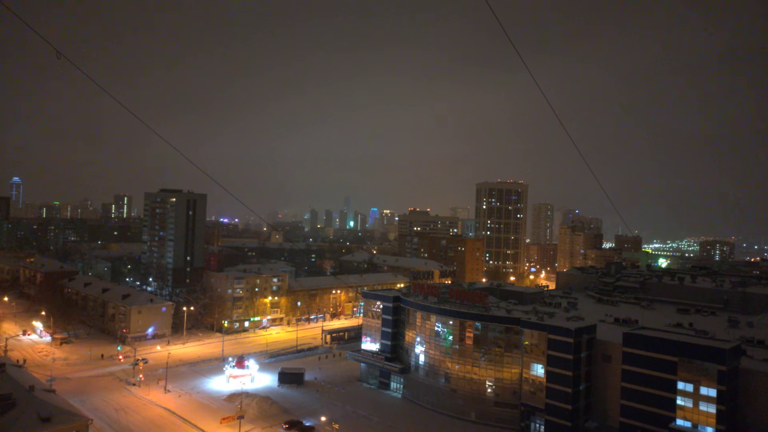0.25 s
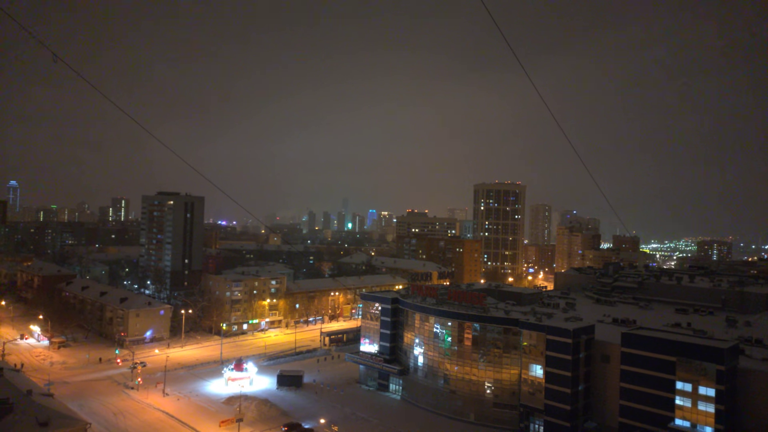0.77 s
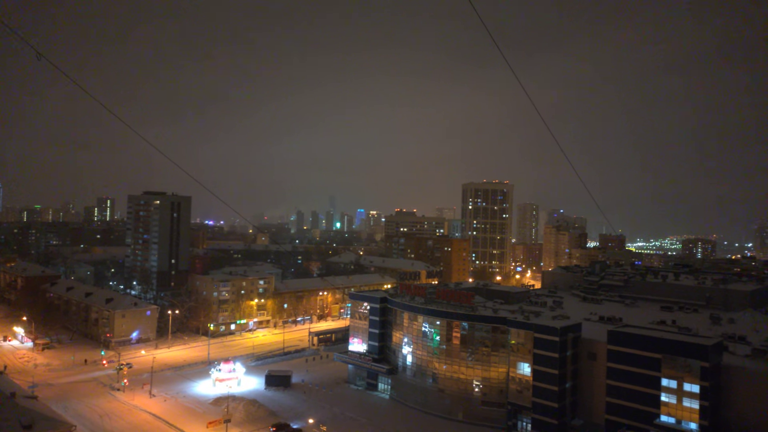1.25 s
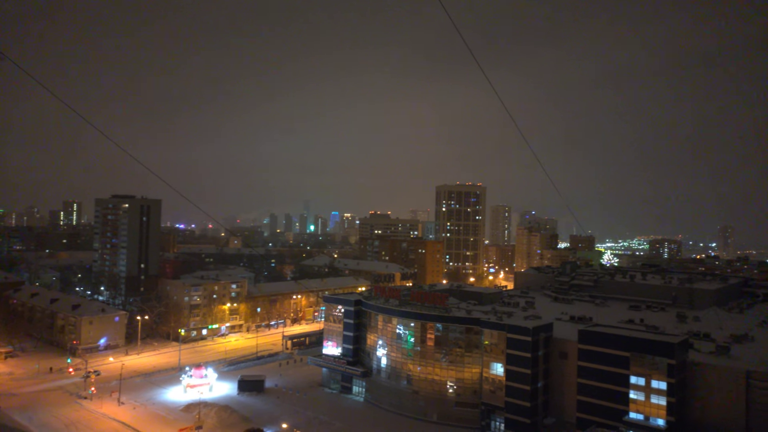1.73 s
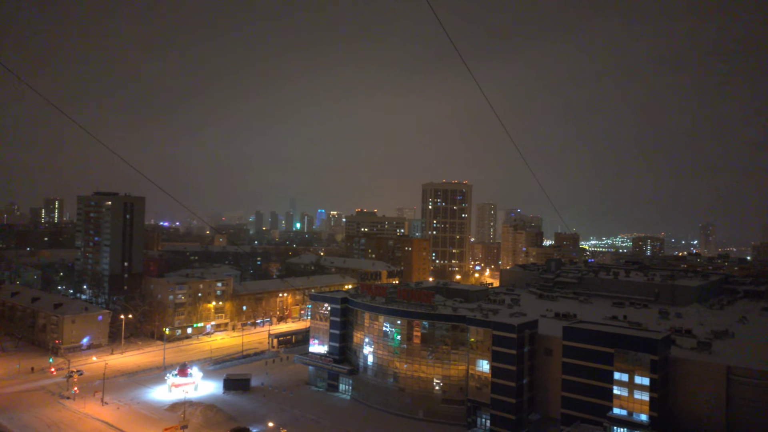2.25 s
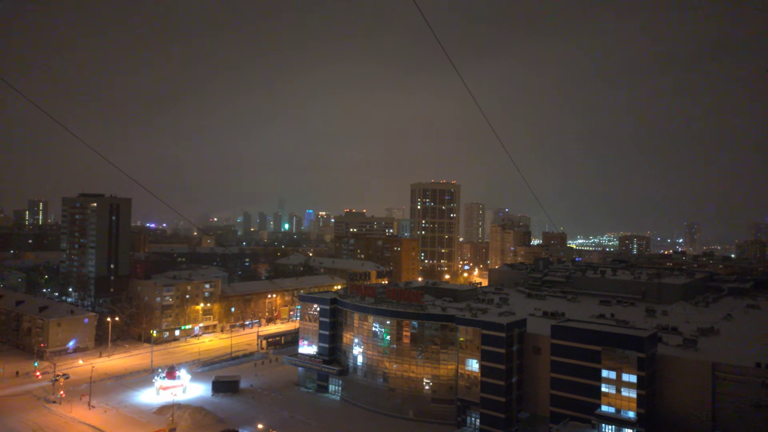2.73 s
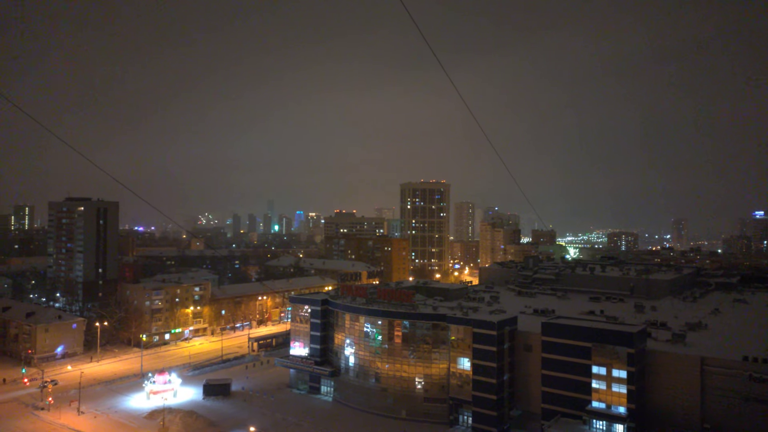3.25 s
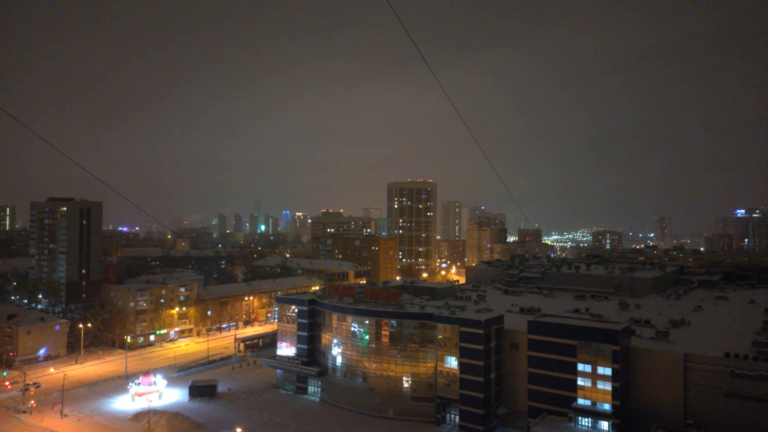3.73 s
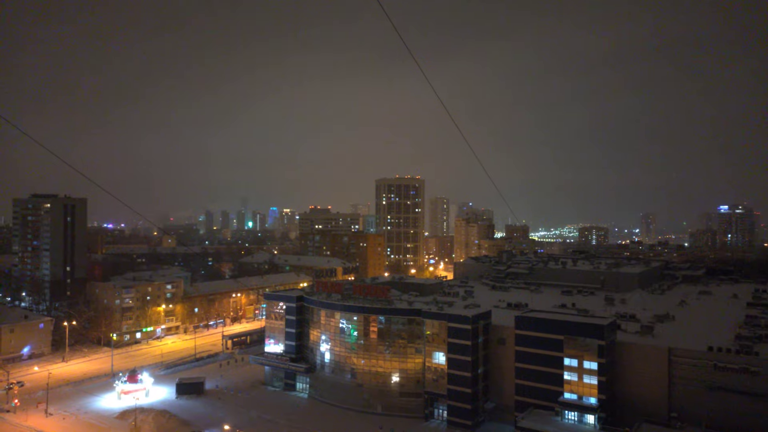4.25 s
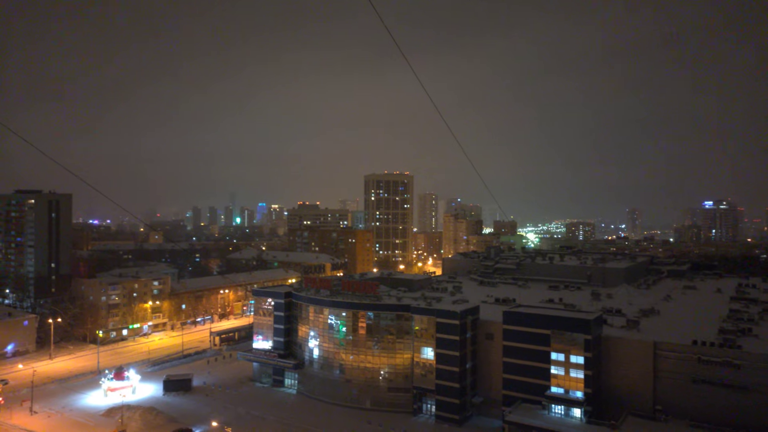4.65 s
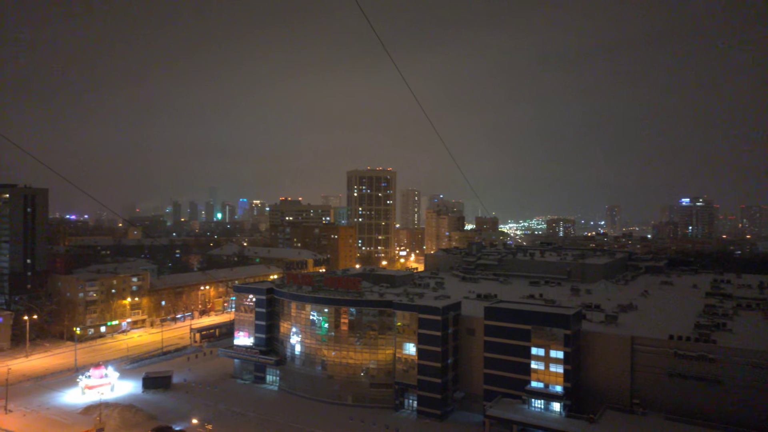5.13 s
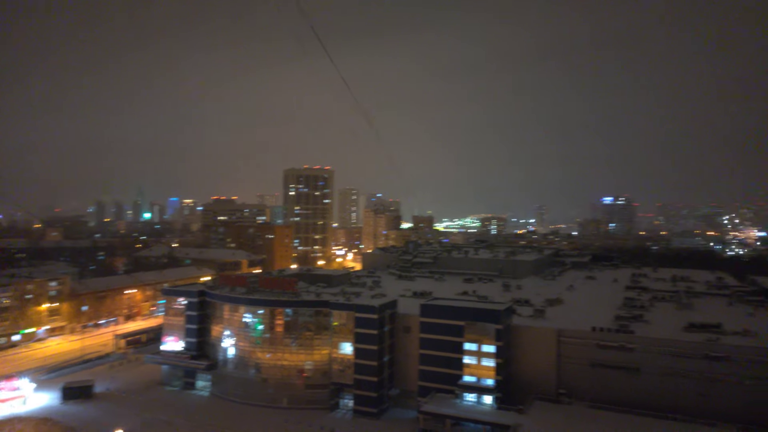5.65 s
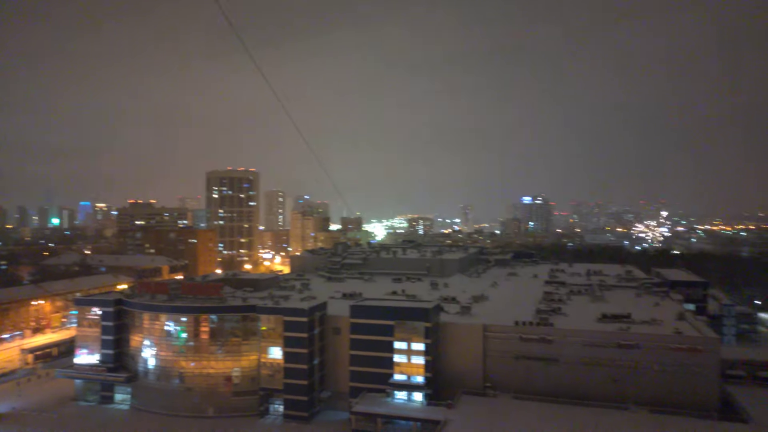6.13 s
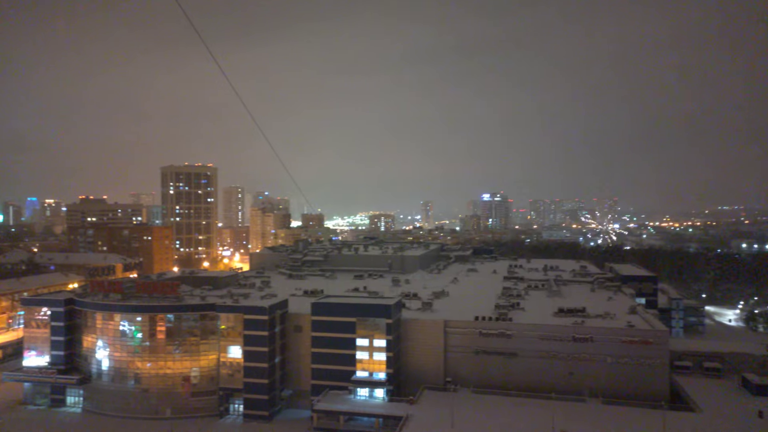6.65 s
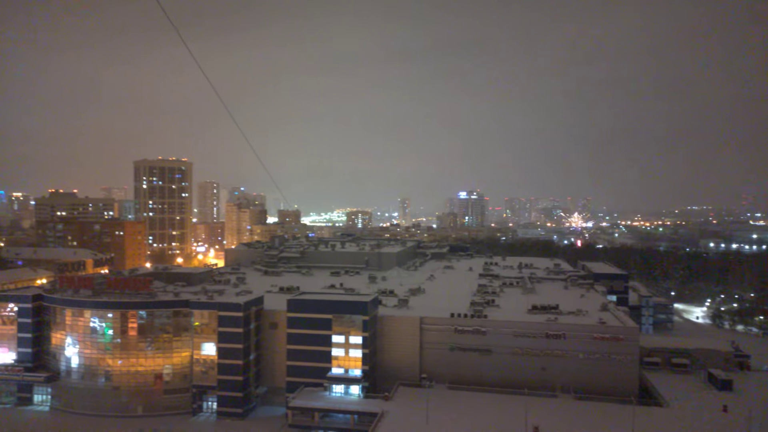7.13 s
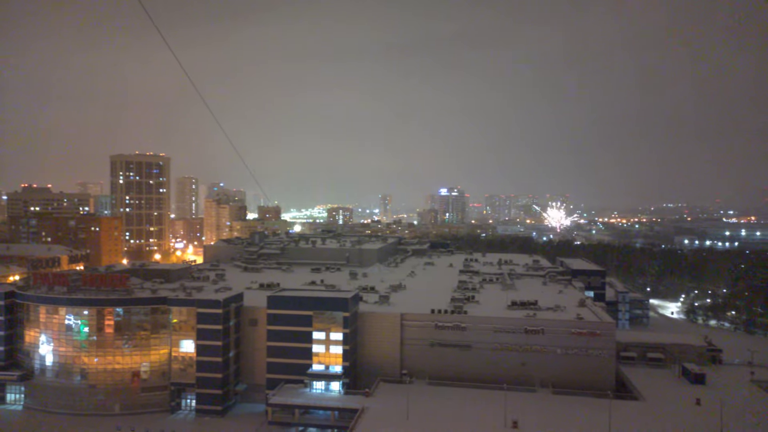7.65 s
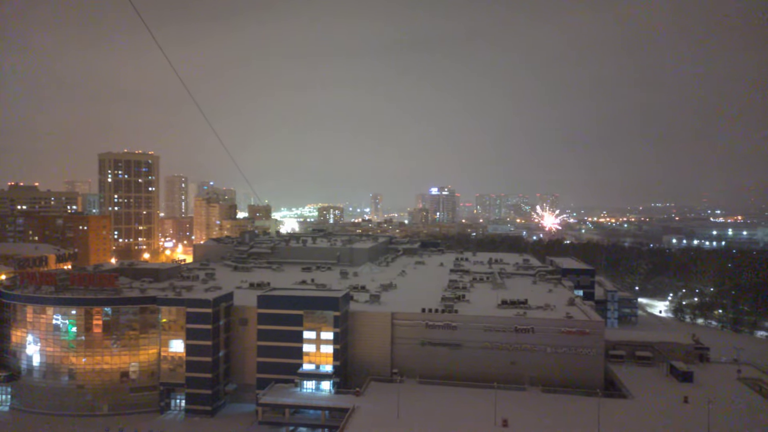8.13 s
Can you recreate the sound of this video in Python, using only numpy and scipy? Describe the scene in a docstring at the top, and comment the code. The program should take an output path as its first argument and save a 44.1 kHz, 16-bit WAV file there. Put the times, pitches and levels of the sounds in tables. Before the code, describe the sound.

A wide stereo phone pickup outdoors catches a dull, wind-like rumble of distant fireworks, mostly low and muffled. Light thuds come first, with a tiny close click near one second, then firmer knocks and double bangs, a faint squeal and brief whistle. Occasional nearer shots return as quick clustered echoes from buildings. After six seconds a nearer display brings strong bangs in quick succession, each lifting the roar.

```python
"""A throbbing rumble of countless far fireworks over a night city, with cloth rustling and ticking close by.
Farther shells bang and roll, each bang a minimum-phase front with decaying echoes; a thin squeal comes
from the road, then short whistles, a snap and a narrow-band tick, all sines of unsteady pitch. A battery
close by fires single shots that the same house fronts return each time; every bang lifts the noisy roar.
Two microphone ports of a phone on a high balcony hear it, differing in colour, level and arrival time."""
import sys
import numpy as np
from scipy import signal
from scipy.fft import rfft, irfft, next_fast_len
from scipy.io import wavfile
from scipy.ndimage import uniform_filter1d, minimum_filter1d

SR = 44100
rng = np.random.default_rng(int(sys.argv[2]) if len(sys.argv) > 2 else 0)


def generate_wav(sig):
    """Save sig (samples, or channels by samples) to the path in sys.argv[1] as 16-bit PCM at SR."""
    pcm = np.round(np.clip(np.atleast_2d(sig).T, -1, 1) * 32767).astype(np.int16)
    wavfile.write(sys.argv[1], SR, pcm)


N = 369558

# Shots of the near battery. Each row: time in seconds, levels of crack, thump and sizzle in dB,
# level added to all house fronts in dB, extra brightness of the first house front in dB.
SHOTS = [(2.6624, -23, -10.5, -49, -4, -3), (3.1172, -26, -9.5, -52.5, -3.5, -2),
         (4.6285, -24.5, -11.5, -47.5, -2, 22.5), (5.8225, -19.5, -8, -46.5, -3.5, -7),
         (8.1293, -24, -11, -51, 0.5, -2)]
# Bangs of farther shells, some with their wall echoes, second arrivals or tails as rows of their own.
# Each row: time in seconds, levels of knock, thump and crack in dB, left minus right in dB,
# echo level in dB, knock pitch in semitones (before a common shift), crack brightness in semitones,
# blur of the front in dB.
SHELLS = [(0.272, -14.5, -18.5, -30.5, 4.5, -21.5, 0.8, -3, -2),
          (0.513, -40, -20, -40, -4.5, -31, -1.2, 1.6, -1), (0.642, -37, -20, -58, 0, -27, -8, -2.4, -2),
          (0.672, -40, -16, -64, 1, -22, 0, -3.8, -2), (0.72, -22, -23.5, -58, 2.5, -22.5, -8, -0.6, 1),
          (1.188, -46, -18, -60, -6, -22.5, -6.0, 1.9, -4), (1.619, -29.5, -16, -62, 8, -29, -2, -9, -1),
          (1.8277, -19, -24, -27, -2.5, -22, -2, -7, -1.5), (1.897, -28, -12, -62, 8, -27, -1, -4.9, -2.5),
          (1.947, -25, -20.5, -62, 4.5, -25, -2, -1, -3), (2.2759, -11, -16, -45, 9, -36, -4.5, -8, -11),
          (2.279, -12, -13, -48, 5, -25.5, -2.5, -8.0, -5.5),
          (2.289, -19, -12.5, -58, 1, -31, -6, -8.0, -7), (2.323, -13, -38, -41, 5, -21, 0.5, -6.5, -6),
          (2.522, -43, -19.5, -57, 0, -23.5, -11, -11, -3), (2.887, -23, -28, -50, 15, -28, -1, -6.7, -3),
          (2.921, -37, -17.5, -58, -4, -27, -2.7, -3.7, -5.5),
          (3.097, -11.5, -26, -31, 2, -29.5, 2.5, -7.3, -2.5),
          (3.107, -19, -22, -28.5, 1.5, -20.5, 1.5, -1.3, -6), (3.203, -42, -16, -34, 3, -21.5, -6.0, 0, 0),
          (3.225, -37, -20, -41, 4, -20, -6, -2.0, -4), (3.25, -34, -21, -33, 3, -21.5, -6, 6, -3),
          (3.293, -42, -33, -40, -2.5, -21, 0.5, -2.0, -2), (3.415, -29.5, -26, -54, 6, -29, -4.5, -4.3, 0),
          (3.642, -34, -16, -40, 5, -23.5, -2, 0.5, -7), (3.74, -41, -15, -45, 3, -25, -11, -0.3, -2),
          (3.806, -32, -22, -40, 0.5, -21.5, -6.0, -5.9, -3), (4.459, -44, -13, -50, 5, -23, -6.0, 0.6, -8),
          (4.508, -32, -19, -57, 10, -23, -2, -3.4, -4), (4.595, -29, -24, -54, 8, -35.5, -1, -6, -7),
          (4.732, -9.5, -21, -26.5, 4.5, -29, 2.5, -12, -4),
          (4.742, -10.5, -25, -31, 7.5, -31, -0.5, -1.2, -4),
          (4.756, -13, -23, -38, 5.5, -30, -4.3, -6.7, -4.5), (4.797, -17, -23, -32, 6.5, -21, 3.5, -2, 1),
          (4.818, -18.5, -26, -40, 6.5, -30, -7.5, -5.5, -2.5),
          (4.839, -30.5, -33, -40, 12, -16, -6, 0, -4), (4.899, -21, -16, -42, 8, -25, -5, -8, -1),
          (5.273, -20, -16.5, -44, 9, -21.5, -5.5, -10, 0),
          (5.333, -28.5, -27.5, -46.5, 1, -13.5, -3.2, -8.5, -6),
          (5.5423, -9.5, -9.5, -42, 4.5, -34, 0, -2, -8), (5.5459, -13.5, -7, -53, 4, -28, -3.5, -6, -6),
          (5.556, -18, -12, -56, 6, -31.5, 1, -6.7, -7),
          (5.588, -14, -16, -35.5, 5.5, -21.5, -0.9, -7, 0.5),
          (5.999, -23, -41, -43.5, 16, -16, -5, -7.7, -4),
          (6.1444, -7, -14, -27, 1.5, -23.5, 0.8, -4.6, -0.5), (6.385, -15, -15, -32, 3, -18, 5, -5, 0),
          (6.505, -23, -18.5, -63, 7.5, -25, -5.5, -5, -3.5),
          (6.577, -9.5, -9.5, -28.5, 4, -20, 3, -5.4, 0.5), (6.822, -28, -24, -46, 0, -22, -6, -4.5, -2),
          (7.077, -19, -13.5, -59, 1.5, -20.5, -5, -6.4, -7),
          (7.26, -16.5, -8.5, -61, 0.5, -23.5, -4, -7.9, 2), (7.389, -17, -15.5, -33, -2.5, -34, -5, -5, 1),
          (7.397, -11, -17.5, -33, -2, -23, 3, -6, 5.5), (7.407, -13, -15, -41, -1, -21.5, 5.5, -5, 1),
          (7.425, -31, -30, -47, 0, -20, -3, -8.0, -2), (7.501, -37, -16.5, -55, -5, -18.5, -7, -5.6, -4),
          (7.523, -10.5, -15, -32.5, -3, -18, -0.4, -5, -0.5),
          (7.543, -24, -19.5, -35.5, 1.5, -23, 8, -5.7, -1),
          (7.5633, -9.5, -15.5, -28, 4.5, -22, -4.5, 0.7, -2),
          (7.675, -23, -22, -62, -6.5, -29, -2, -3, -1), (7.723, -34, -21, -52, 1, -33, -8, -5.9, -4),
          (7.821, -18.5, -21.5, -42, 1, -16, 0.8, -5, -4), (7.829, -6, -8.5, -27.5, 1.5, -24, 3.5, 2, 0),
          (8.076, -18, -15.5, -52, -0.5, -21.5, -4, -6, -8),
          (8.183, -32, -10.5, -29.5, 0, -26, -9, -0.0, -1), (8.191, -34, -21, -21, 5, -33, -4.5, 1, -3.5),
          (8.3, -28, -33, -40, 3, -14.5, -2.5, -4.9, -2)]
ALIKE = (0.25, 0.9, 0.55)  # share of echo power common to both ports: middle, low, high band


def undb(db):
    """Amplitude ratio of a level: 20 dB is a factor of ten."""
    return 10 ** (np.asarray(db) / 20)


def read(table, hz):
    """A spectrum as straight lines between (Hz, value) points on a log-frequency axis."""
    points_hz, values = np.transpose(table)
    return np.interp(np.log(hz + 1), np.log(points_hz), values)


def split(hz, low_hz, high_hz, order=4):
    """Crossover: gains of a middle, a low and a high band whose powers overlap smoothly."""
    low = 1 / (1 + (hz / low_hz) ** 4)
    high = 1 / (1 + (high_hz / (hz + 1)) ** order)
    return np.sqrt(np.array([(1 - low) * (1 - high), low, high]) + 1e-9)


def pulse(gain):
    """Minimum-phase response of a gain curve, peak 1: the treble comes first, the bass follows."""
    cepstrum = irfft(np.log(gain))
    # folding the cepstrum onto positive time makes the response causal
    cepstrum[1:len(gain) - 1] *= 2
    cepstrum[len(gain):] = 0
    response = irfft(np.exp(rfft(cepstrum)))[:len(gain)]
    return response / np.abs(response).max()


def walk(rate):
    """Slow random modulation: levels held 1 / rate seconds and slewed twice; spread near 1."""
    hold = int(SR / rate)
    steps = np.repeat(rng.standard_normal(N // hold + 1), hold)
    return 1.3 * uniform_filter1d(uniform_filter1d(steps, hold), hold)[:N]


def add(train, s, x, pan_db):
    """Interaural cues: sound from the left reaches the left port earlier and louder."""
    pan_db = np.clip(pan_db, -6, 6)
    for port, sign in enumerate((1, -1)):
        i = int(s * SR - 2 * sign * pan_db)
        part = x[port][:N - i]
        train[port, i:i + len(part)] += part * undb(sign * pan_db / 2)


def echoes(t60, rise, alike, lumpy_db, size=1 << 14):
    """Diffuse reverberation: lumpy noise swells and decays exponentially; the ports share part of it."""
    t60 = np.clip(t60, .006, 1.5)
    both, *own = rng.standard_normal((3, size))[:, :int(t60 * SR)]
    t = np.arange(len(both)) / SR
    lumps = np.repeat(undb(lumpy_db * rng.standard_normal(size // 128 + 1)), 128)[:len(t)]
    share = np.clip(alike, 0, 1)
    shape = (1 - np.exp(-(t / rise) ** 2)) * undb(-60 * t / t60)
    return shape * lumps * (np.sqrt(share) * both + np.sqrt(1 - share) * np.array(own))


def rolling(base_db, layer):
    """Power summation: a layer's gain joins its own power to the power each bang leaves rolling."""
    # What a bang leaves over the town; rows are rumble, wash, deep roll, bright wash.
    # Each row: level relative to the bang in dB, rise in seconds, 60 dB decay time in seconds.
    after_shot = [(-10, 0.31, 0.5), (-20.5, 0.22, 0.99), (-24, .05, 1.1), (-29.5, 0.081, 0.83)]
    after_shell = [(-11.5, 0.1, 0.17), (-35, 0.045, 0.36), (-34, 0.025, 0.4), (-21.5, 0.034, 0.41)]
    # thumps feed rumble and deep roll, cracks and knocks the wash;
    # the crack of either kind feeds the bright wash
    columns = ((2, 2), (1, 1), (2, 2), (1, 3))[layer]
    t = np.arange(N)[::128] / SR
    power = undb(base_db) ** 2
    for bangs, after, column in zip((SHOTS, SHELLS), (after_shot, after_shell), columns):
        bangs = np.array(bangs)
        db, rise, t60 = after[layer]
        since = np.maximum(t - bangs[:, :1], 0)
        swell = 1 - np.exp(-(since / rise) ** 2)
        each = swell * undb(bangs[:, column, None] + db - 60 * since / t60)
        power = power + np.interp(np.arange(N) / SR, t, np.sum(each ** 2, axis=0))
    return np.sqrt(power)


def city():
    """Superposed far shells become modulated noise, partly coherent between the ports; air hisses on top."""
    # Background. Each row: time in seconds, levels of rumble, wash, hiss, bright wash and deep roll in dB.
    background = [(0.0, -28, -36, -58, -67, -47.5), (0.7, -24.5, -45.5, -56, -55, -54),
                  (0.87, -25.5, -38, -56.5, -47.5, -51), (1.02, -26.5, -44.5, -55, -54.5, -52),
                  (1.4, -28, -45, -60.5, -61, -47), (1.91, -25.5, -49, -59.5, -60, -48),
                  (2.63, -26.5, -36.5, -59, -52, -50), (3.17, -25.5, -40.5, -56.5, -51.5, -41.5),
                  (3.24, -28, -38, -47, -40, -38), (3.38, -24, -36.5, -59.5, -50, -50.5),
                  (4.15, -24.5, -38, -62, -54.5, -44), (4.46, -27, -40.5, -60, -57, -48),
                  (4.67, -21, -36.5, -60, -55, -53), (4.81, -22, -29.5, -53, -44.5, -54),
                  (5.02, -24.5, -36, -61, -54, -45.5), (5.86, -26, -40, -57.5, -58, -56),
                  (6.02, -23, -38.5, -58.5, -59, -63), (6.18, -24, -39, -61, -49, -45),
                  (6.42, -27.5, -41, -63.5, -58, -42), (6.6, -22, -36, -60, -49, -49),
                  (7.0, -25.5, -37.5, -62, -60, -49), (7.35, -27, -40, -63, -73, -49.5),
                  (8.12, -20.5, -44, -63, -51, -52.5), (8.27, -23.5, -49, -51, -51, -58),
                  (8.31, -28, -50.5, -61, -47, -56), (8.38, -23, -32, -58, -45, -53)]
    # Spectrum of the roar. Each row: frequency in Hz, spectral level in dB per Hz.
    roar = [(20, -21), (80, -25.5), (175, -2), (260, 0), (590, -8.5), (800, -16), (1300, -21), (2200, -37),
            (3000, -39), (3500, -46.5), (4500, -49.5), (6500, -54), (8400, -52), (10000, -64),
            (15700, -80.5)]
    # Directness. Each row: frequency in Hz, share of the power that comes from one side.
    direct = [(60, 0.92), (170, 0.94), (300, 0.8), (800, 0.19), (2000, 0.37), (6000, 0.078)]
    bright_hz, bright_octaves = 2255, 0.49
    deep_hz, deep_width_hz = 80.4, 48
    drift_db, drift_per_s = 1, 5  # wash and bright wash each wander on their own

    s, *curves = np.transpose(background)
    t, size = np.arange(N) / SR, next_fast_len(N)
    rumble_db, wash_db, hiss_db, bright_db, deep_db = (np.interp(t, s, db) for db in curves)
    wash = rolling(wash_db + drift_db * walk(drift_per_s), layer=1)
    rumble = rolling(rumble_db, layer=0)
    bright = rolling(bright_db + drift_db * walk(drift_per_s), layer=3)
    levels = wash, rumble, undb(hiss_db), bright

    # each far shell lifts the roar at once and lets it sink
    hits = (rng.random(N) < 70 / SR) * rng.exponential(0.2, N)
    throb = 1 + signal.lfilter([1], [1, -np.exp(-1 / (0.033 * SR))], hits)
    flickers = throb ** .6, throb ** .8, undb(1.8 * walk(16)), throb * undb(1.5 * walk(40))

    hz = np.fft.rfftfreq(size, 1 / SR)
    bright_band = np.exp(-(np.log2(hz / bright_hz + 1e-9) / bright_octaves) ** 2)
    gains = *split(hz, 784, 4620), bright_band
    share = np.clip(read(direct, hz), 0, 1)
    # above the bass the left port hears the shared part 26 samples ahead
    lag = np.exp(-2j * np.pi * np.maximum(hz - 450, 0) * 26 / SR)
    out = 0
    for gain, level, flicker in zip(gains, levels, flickers):
        one, left, right = rfft(rng.standard_normal((3, N)) * flicker, size)
        from_left = np.sqrt(share) * one * np.array([lag ** 0, lag])
        all_around = np.sqrt(1 - share) * np.array([left, right])
        x = irfft((from_left + all_around) * gain * undb(read(roar, hz)), size)[:, :N]
        out = out + x / x.std() * level

    # the deepest part of the bangs rolls on, alike in both ports
    deep_band = np.exp(-((hz - deep_hz) / deep_width_hz) ** 2)
    deep = irfft(rfft(rng.standard_normal(N), size) * deep_band, size)[:N]
    return out + deep / deep.std() * rolling(deep_db + 2.6 * walk(7.1), layer=2)


def cloth_and_ticks():
    """Friction and impact: cloth is flickering noise, a tick an impulse with a short ring-out."""
    # Cloth near the phone. Each row: start of the hold in seconds, hold in seconds, level in dB.
    cloth_moves = [(0.08, 0.057, -62.5), (0.48, 0.053, -66), (0.593, .015, -69), (0.745, .015, -72),
                   (3.407, 0.068, -75), (3.525, 0.33, -66.5)]
    # Small ticks. Each row: time in seconds, level in dB, left minus right in dB.
    tick_times = [(0.842, -65, -5), (0.945, -35.5, -8), (0.951, -33.5, 9), (1.234, -50, -3),
                  (1.2494, -64, 5), (1.2805, -62, 6), (1.3443, -63, -8), (3.042, -50, -3), (3.4385, -48, 4),
                  (3.5274, -55, -8), (3.718, -55, 0), (3.7837, -45, -3), (6.477, -51, -11),
                  (7.452, -57, -0.5)]
    # Colour of both. Each row: frequency in Hz, gain in dB.
    rustle = [(1500, -43.5), (4000, -12), (6500, -13.5), (8500, -6), (10500, -13), (16000, -27)]
    rise_db_s, fall_db_s = 307, 197  # slopes of the cloth before and after its hold

    train, t = np.zeros((2, N)), np.arange(N) / SR
    for s, db, pan_db in tick_times:
        tick = echoes(0.19, 0.0011, 0.16, lumpy_db=4.0) * undb(-19.0)
        tick[:, 0] = 1
        add(train, s, tick * undb(db), pan_db)
    cloth = 0
    for s, hold, db in cloth_moves:
        before, after = np.maximum(s - t, 0), np.maximum(t - s - hold, 0)
        cloth = cloth + undb(db - rise_db_s * before - fall_db_s * after)
    train += cloth * undb(2.5 * walk(60)) * rng.standard_normal((2, N))
    response = pulse(undb(read(rustle, np.fft.rfftfreq(1024, 1 / SR))))
    return signal.oaconvolve(train, response[None], axes=1)[:, :N]


def shells():
    """Absorption with distance dulls each bang differently; it snaps, then drags a decaying roll of echoes."""
    # Spectrum of a far bang. Each row: frequency in Hz, gain in dB.
    far_bang = [(20, -40), (70, -21.5), (160, -3), (310, -1), (600, -8.5), (1000, -16), (2000, -24.5),
                (3200, -36), (5500, -49.5), (8300, -57.5), (10500, -74.5), (16000, -89.5)]
    # from 5.95 s a nearer display fires; before, the air has taken the top off each crack
    nearer_from_s, crack_top_hz = 5.95, (6000, 11000)  # tops of a usual bang: far, nearer display
    knock_shift = 2.8  # semitones added to every knock
    focus = .6  # dB that the bare front gains for each dB less blur
    late_s, spread = (0, 0.00095, 0), (.8, 0.14, 0.84)  # the thump comes later and less directed
    # levels below: knock, thump, crack
    snap_db, snap_t60_s = (-21.5, -37.5, -12.5), 0.043  # nearest walls thicken the front
    bounce_s, bounce_db = 0.0018, (-10.5, -13.5, -12)  # the ground returns each bang at once
    echo_offset_db, usual_t60_s = (-4, -1, 7.5), (0.22, 0.19, 0.2)
    echo_usual_db, longer_per_db = -22.5, 0.09  # strong echoes also ring longer
    dulling = signal.butter(1, 2820, fs=SR)  # echoes travel farther and come back duller

    def colour(f):
        """Spectral shaping: far bang split into middle, low and high band."""
        return split(f, 302, 1160, order=8) * undb(read(far_bang, f))

    out, hz = np.zeros((2, N)), np.fft.rfftfreq(2048, 1 / SR)
    for s, *shell_db, pan_db, echo_db, pitch, bright, blur_db in SHELLS:
        top_hz = crack_top_hz[int(s > nearer_from_s)] * 2 ** (bright / 12)
        knock = colour(hz / 2 ** ((pitch + knock_shift) / 12))[0]
        thump = colour(hz)[1]
        crack = colour(hz)[2] / np.sqrt(1 + (hz / top_hz) ** 8)
        longer = np.exp(longer_per_db * (echo_db - echo_usual_db))
        for band, gain in enumerate((knock, thump, crack)):
            snap = echoes(snap_t60_s, .0002, .6, lumpy_db=2.5, size=4096) * undb(snap_db[band] + blur_db)
            snap[:, 0] = undb(-focus * blur_db)
            snap[:, int(bounce_s * SR)] += undb(bounce_db[band])
            roll = echoes(usual_t60_s[band] * longer, .004, ALIKE[band], lumpy_db=2)
            roll *= undb(echo_db + echo_offset_db[band])
            arrivals = np.zeros((2, max(snap.shape[1], roll.shape[1])))
            arrivals[:, :snap.shape[1]] += snap
            arrivals[:, :roll.shape[1]] += signal.lfilter(*dulling, roll)
            bang = -signal.fftconvolve(arrivals, pulse(gain)[None], axes=1)  # inverted polarity
            add(out, s + late_s[band], bang * undb(shell_db[band]), pan_db * spread[band])
    return out


def squeal():
    """Amplitude and frequency modulation: a thin unsteady tone in a breathy band, and short gated sines."""
    # Loudness of the long tone. Each row: time in seconds, level in dB.
    tone_levels = [(1.55, -79), (2.0, -72), (2.1, -65), (2.4, -79), (2.57, -66), (2.7, -64), (3.03, -75),
                   (3.3, -78), (3.7, -84)]
    # Short whistles, a snap and a narrow-band tick, all sines of unsteady pitch.
    # Each row: start and end in seconds, start and end pitch in Hz, level in dB, wobble in Hz.
    short_tones = [(3.24, 3.28, 3700, 3600, -54, 200), (6.82, 6.87, 6900, 6800, -64, 700),
                   (7.23, 7.32, 7100, 7000, -64, 220), (7.7, 7.86, 3700, 4200, -73, 70)]
    tone_hz, breath_db, breath_width_hz = 7100, -3.5, 550
    beat_hz, beat_depth = 410, .5  # a fast throb puts fainter lines either side; its depth wavers

    t = np.arange(N) / SR
    gain = undb(np.interp(t, *np.transpose(tone_levels), -140, -140) + 3.3 * walk(70))
    gain *= 1 + beat_depth * undb(3 * walk(15)) * np.cos(2 * np.pi * beat_hz * t)
    out = gain * np.sin(2 * np.pi * np.cumsum(tone_hz + 25 * walk(200)) / SR)
    edges_hz = (tone_hz - breath_width_hz, tone_hz + breath_width_hz)
    band = signal.butter(2, edges_hz, "band", fs=SR, output="sos")
    out += gain * undb(breath_db) * 4 * signal.sosfilt(band, rng.standard_normal(N))
    for start, end, start_hz, end_hz, db, wobble_hz in short_tones:
        gate = np.clip(np.minimum(t - start, end - t) / .02, 0, 1)
        hz = np.interp(t, (start, end), (start_hz, end_hz)) + wobble_hz * walk(500)
        out += gate * undb(db + 3.3 * walk(60)) * np.sin(2 * np.pi * np.cumsum(hz) / SR)
    return out


def shocks(train, colour, edges_hz, order):
    """Convolution turns three trains of arrivals into the middle, low and high part of a shock front."""
    hz = np.fft.rfftfreq(4096, 1 / SR)
    shapes = [pulse(gain * undb(read(colour, hz)))[None] for gain in split(hz, *edges_hz, order=order)]
    return sum(signal.oaconvolve(x, shape, axes=1)[:, :N] for x, shape in zip(train, shapes))


def battery():
    """Specular, then diffuse reflection: house fronts return each shot, and scattered echoes swell."""
    # Arrivals of each shot, direct and off house fronts. Each row: levels added to crack, thump and sizzle
    # in dB, left minus right in dB, 60 dB decay time of the smear in seconds.
    fronts = [(4, 0, -6, 7, 0.012), (10, 7.5, 2, 5.5, 0.012), (-1.5, -0.5, -10, -2.5, 0.043),
              (-0.5, -3.5, 13.5, 2, 0.069), (-8.5, 7, 1.5, -7, 0.079), (-5.5, 0.5, -12, -6.5, 0.065),
              (-10, -14, 6, 4, .08)]
    # Delay of each arrival after the direct one, in seconds.
    front_delays_s = (0, .0245, .043, .052, .064, .078, .09)
    # Swell of scattered echoes; rows are crack, thump, sizzle.
    # Each row: level in dB, rise in seconds, 60 dB decay time in seconds, lumpiness in dB.
    shot_roll = [(-16, 0.0063, 0.58, 5), (-25.5, 0.0027, 0.98, 3.5), (3.5, 0.017, 0.41, 3.5)]
    # Spectrum of a near bang. Each row: frequency in Hz, gain in dB.
    near_bang = [(20, -63.5), (70, -23.5), (160, 1), (310, 4), (600, -11), (900, -22), (2000, -28),
                 (3200, -39), (5500, -44.5), (8300, -41.5), (10500, -55.5), (16000, -68)]
    late_s, spread = (0, 0.00308, 0), (1, 0.66, 0.83)  # bass bends round corners: later, less directed
    smear_db = (-15.5, -26.5, -8)  # rough walls smear each arrival: crack, thump, sizzle
    blur_db_s = 119  # later arrivals of crack and sizzle lose their edge, in dB per second of delay

    train = np.zeros((3, 2, N))
    for band in range(3):
        roll_db, rise, t60, lumpy_db = shot_roll[band]
        for s, *shot_db, fronts_db, bright_db in SHOTS:
            for delay, (*path_db, pan_db, smear_t60) in zip(front_delays_s, fronts):
                front = echoes(smear_t60, 0.0012, 0.33, lumpy_db=5.5, size=4096) * undb(smear_db[band])
                front[:, 0] = undb(-blur_db_s * delay * (band != 1))
                db = shot_db[band] + path_db[band] + fronts_db * (delay > 0)
                db += bright_db * (delay == front_delays_s[1]) * (.4, 0, 1)[band]
                add(train[band], s + delay + late_s[band], front * undb(db), pan_db * spread[band])
            roll = echoes(t60, rise, ALIKE[band], lumpy_db, size=SR)
            roll *= undb(shot_db[band] + roll_db + fronts_db)
            add(train[band], s + front_delays_s[1], roll, 3 * spread[band])
    return shocks(train, near_bang, (900, 4200), order=4)


def scene():
    """Linear superposition of all sources at the two ports."""
    return city() + cloth_and_ticks() + shells() + squeal() + battery()


def record(dry):
    """Filtering and gain control: the ports differ in colour, a limiter eases loud peaks, the top is cut."""
    # Port colours. Each row: frequency in Hz, left minus right in dB.
    ports = [(60, 6), (500, 4.5), (1200, 2.5), (2500, -0.5), (4500, -1.5), (8500, -8.5), (12500, 6)]
    ceiling, limit_s, gain_db, top_hz = .95, .004, -1, 15780  # smoothing time; gain ahead of the limiter
    size, k = next_fast_len(N), int(limit_s * SR)
    tilt_db = read(ports, np.fft.rfftfreq(size, 1 / SR)) / 2
    x = irfft(rfft(dry, size) * undb([tilt_db, -tilt_db]), size)[:, :N] * undb(gain_db)
    # the gain falls before a peak and recovers after it, equally in both ports
    room = minimum_filter1d(ceiling / np.maximum(np.abs(x).max(axis=0), ceiling), 2 * k + 1)
    gain = uniform_filter1d(uniform_filter1d(room, k), k)
    return signal.sosfilt(signal.ellip(10, .2, 80, top_hz, fs=SR, output="sos"), x * gain)


dry = scene()
out = record(dry)
generate_wav(out)
```